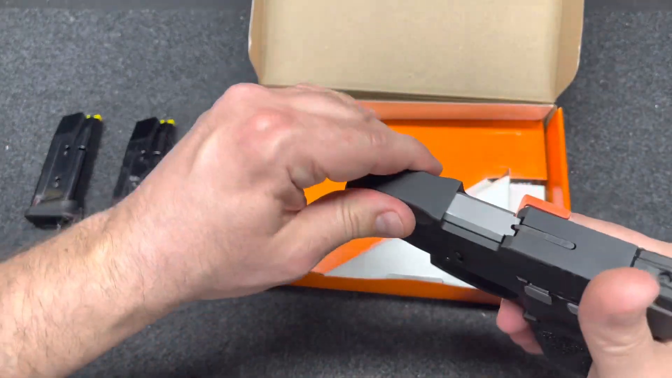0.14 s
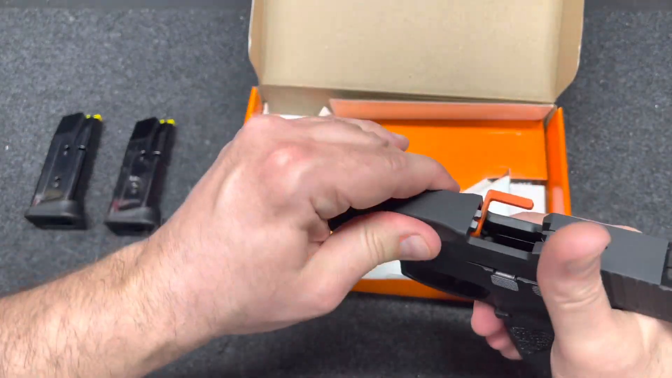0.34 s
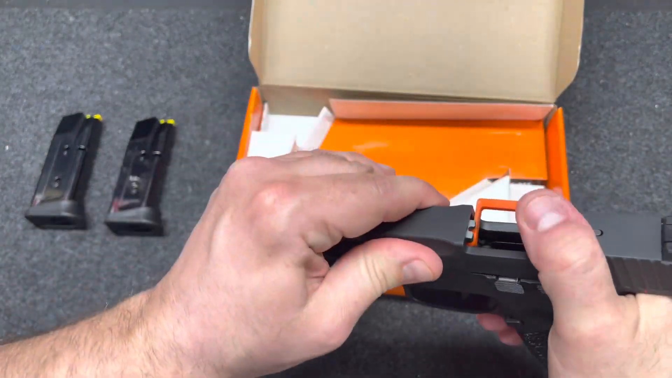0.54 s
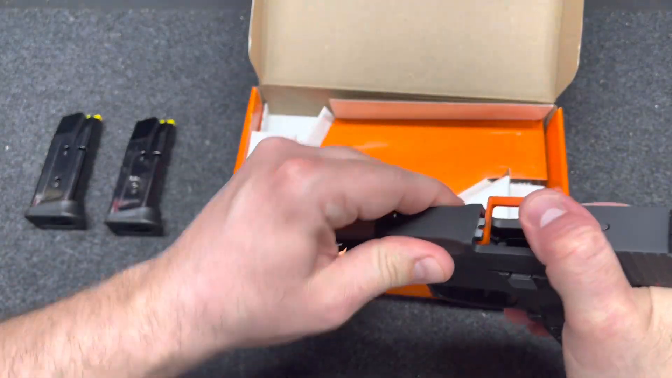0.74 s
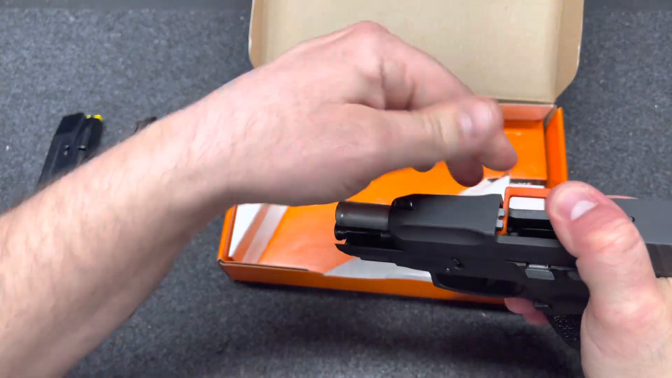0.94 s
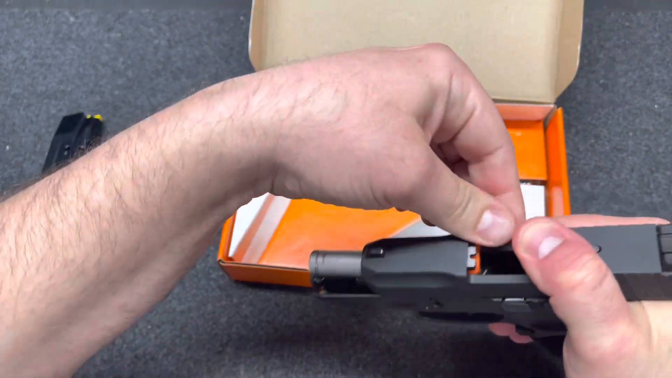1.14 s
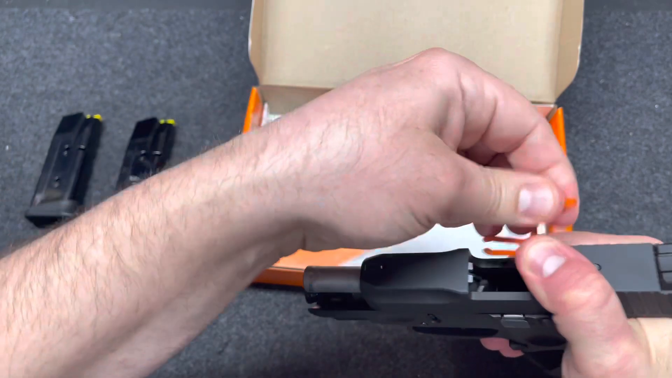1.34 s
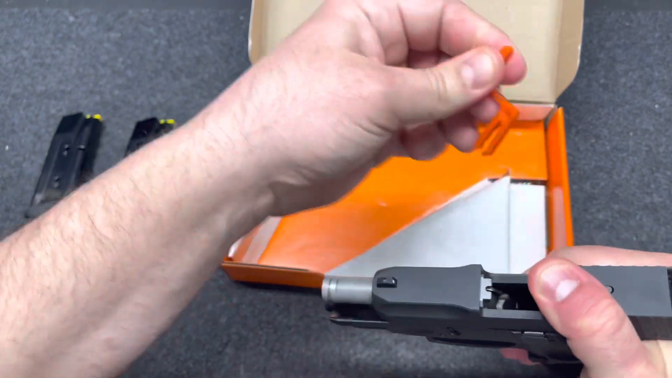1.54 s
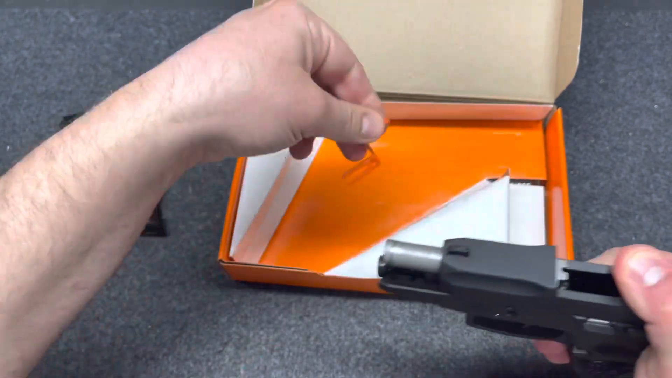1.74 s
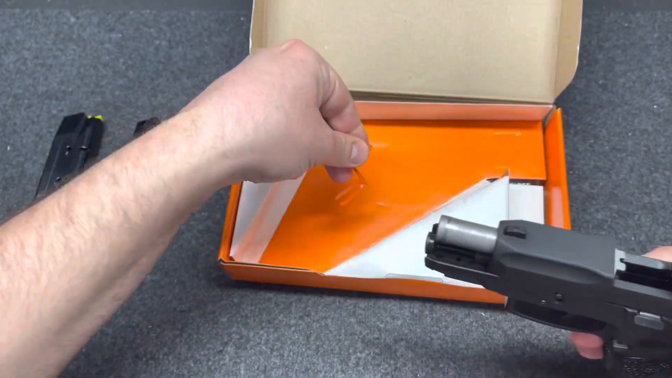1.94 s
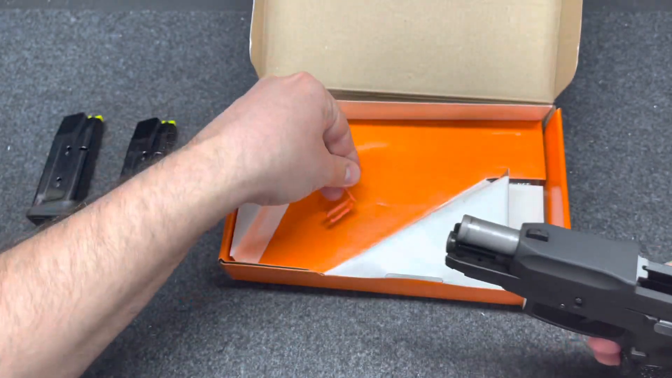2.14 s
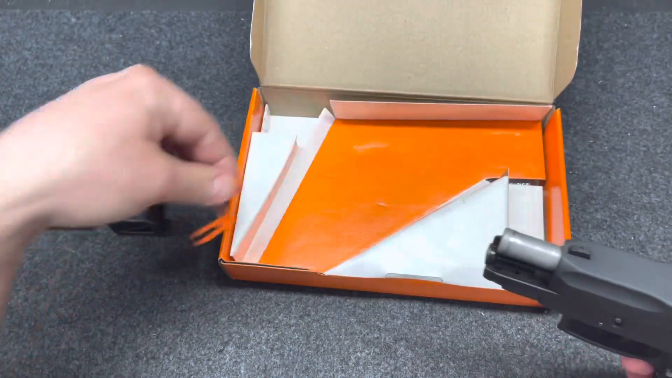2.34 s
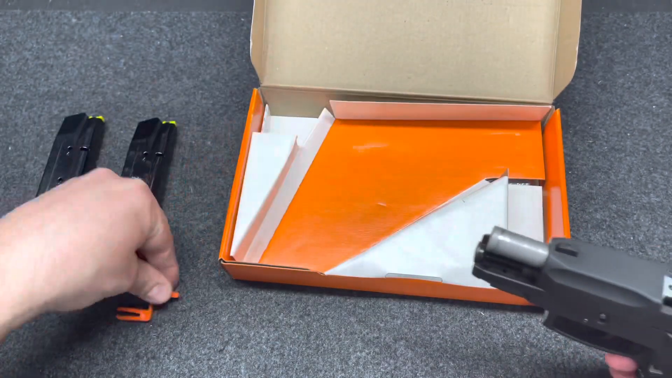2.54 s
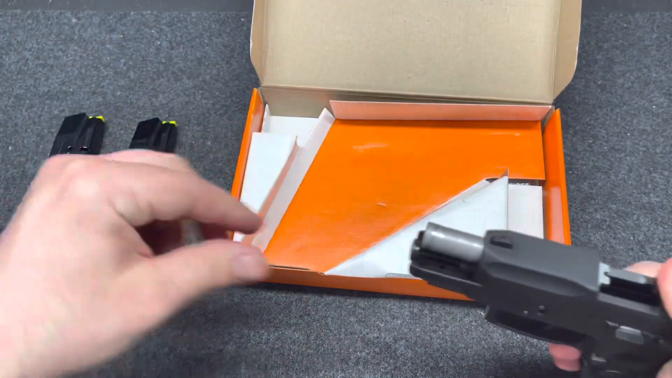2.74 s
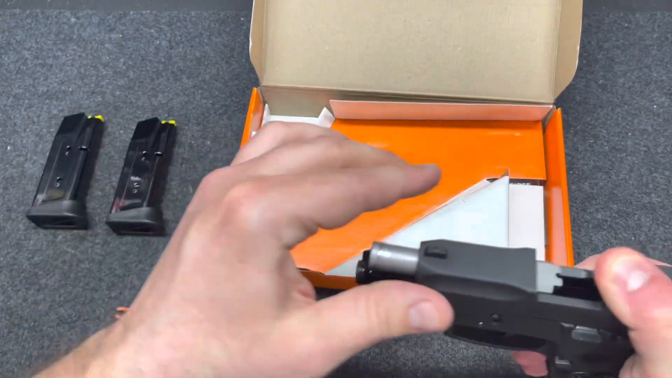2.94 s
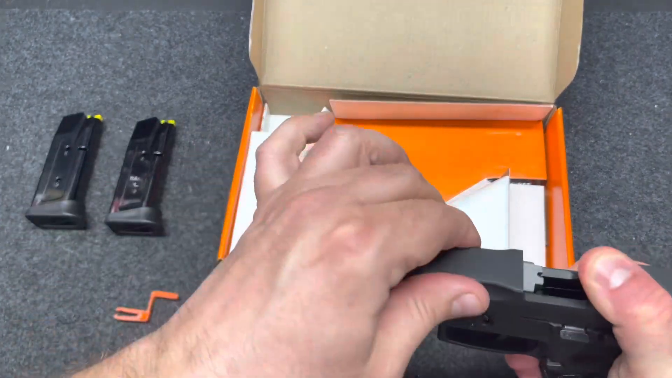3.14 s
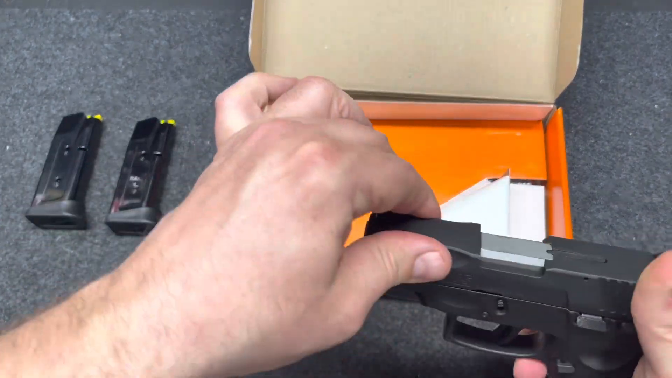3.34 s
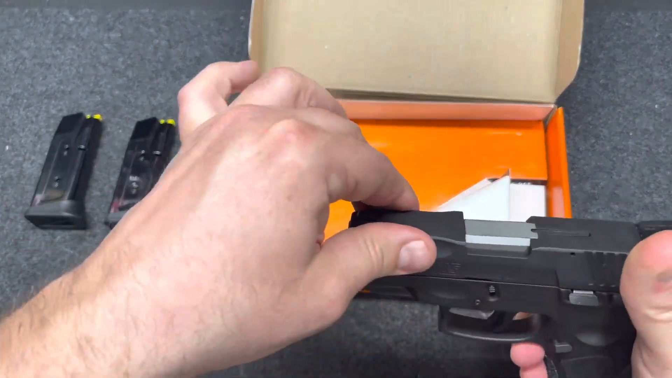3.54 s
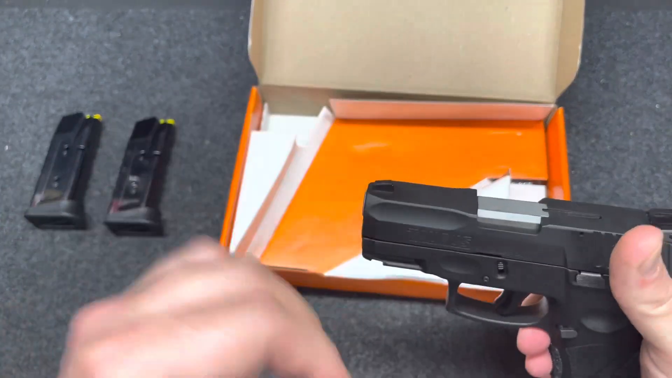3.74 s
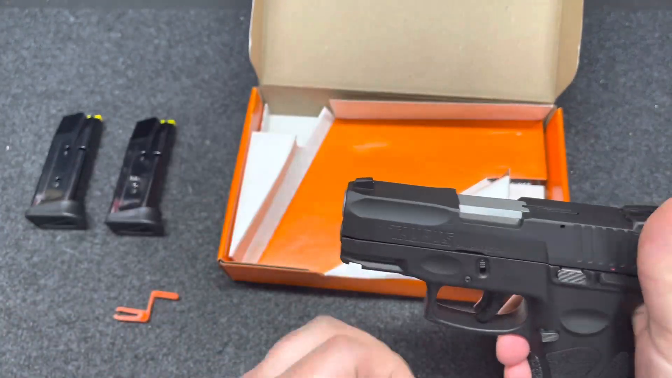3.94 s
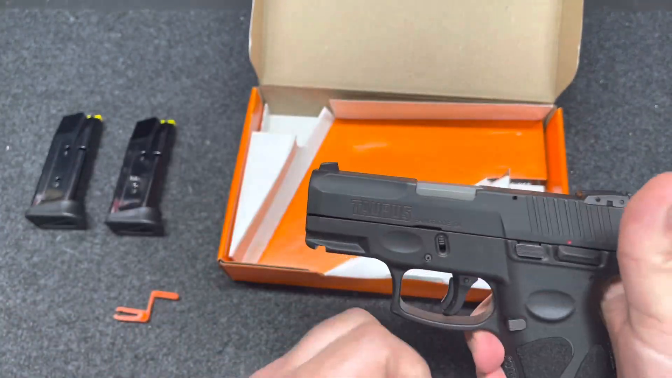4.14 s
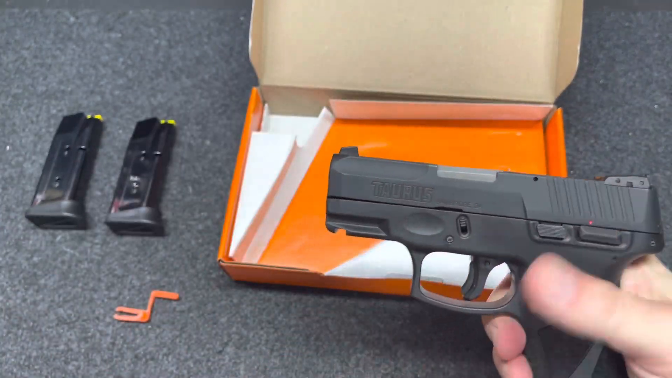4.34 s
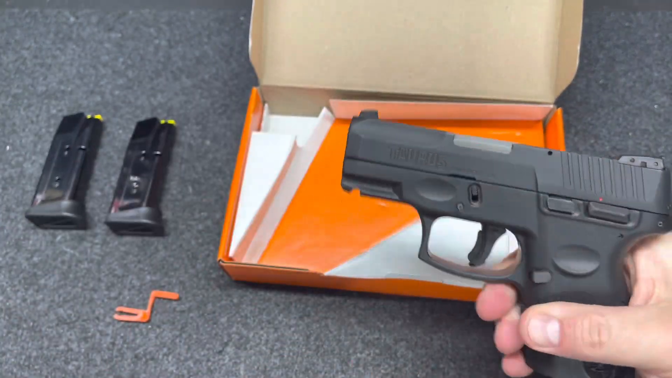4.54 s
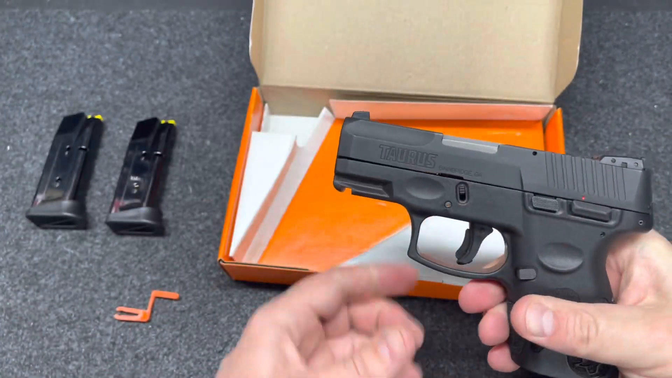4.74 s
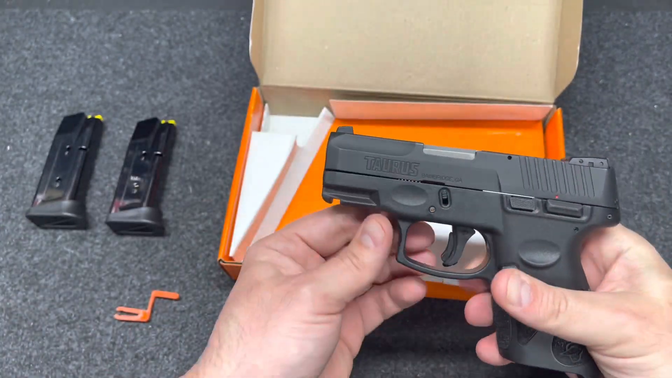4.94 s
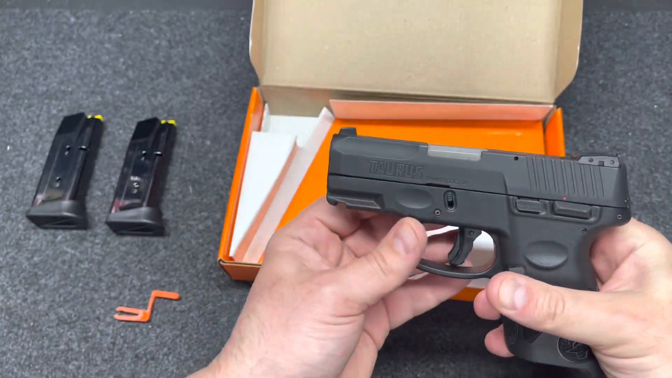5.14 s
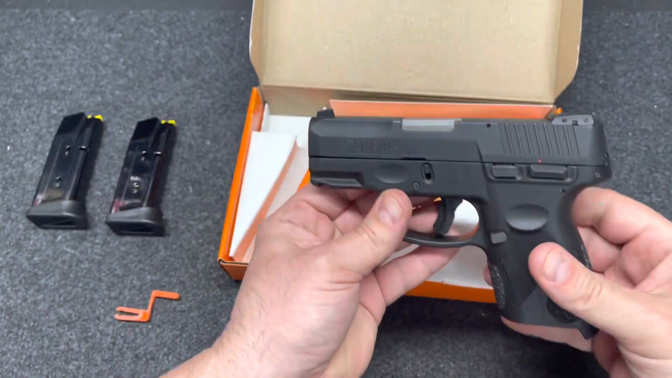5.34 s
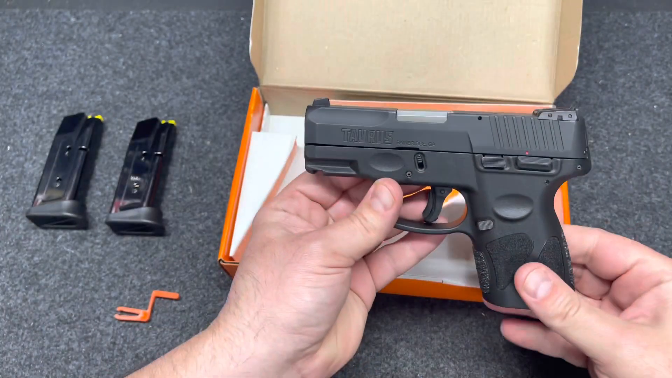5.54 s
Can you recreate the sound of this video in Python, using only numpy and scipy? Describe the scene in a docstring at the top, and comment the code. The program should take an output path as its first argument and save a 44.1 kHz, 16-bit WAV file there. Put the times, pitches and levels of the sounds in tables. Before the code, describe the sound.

A small quiet room with a soft low rumble and faint wavering motor hum throughout. Very close, a pistol slide is worked by hand. From 0.1 to 0.4 s a dense rattle of crisp steel clacks, strongest near 0.3 s, with high thin ringing and a soft low bump. Quiet follows, with light finger rubs and barely audible ticks. At about 1.2-1.3 s come moderate clicks, then a brighter cluster at 1.4-1.55 s with a clear barrel ring. Near silence, with a muffled double table tap at 2.5 s. At 2.9 s sharp loud clacks start, more at 3.03 s, then sliding chatter into the hardest snap at 3.22 s; the low background dips briefly after it. A faint narrow spring buzz fades from 3.4 s. From about 3.45 s to the end at roughly 5.6 s, only small dry skin-on-plastic rustles, clearest around 4.7 and 4.95 s.

```python
"""Pistol handled over a padded table

In a small quiet room the slide is drawn back, a plastic chamber flag is pulled out and laid down, and the slide
is eased forward until it locks. Steel contacts excite shaped noise and ringing modes; fingers rub in grainy noise;
soft bumps ring table modes; a motor hums as wavering sines in low air noise. A gain control cuts the bass briefly
after very loud clacks."""
import sys
import numpy as np
from scipy import signal
from scipy.fft import rfft, irfft, next_fast_len
from scipy.io import wavfile
from scipy.ndimage import uniform_filter1d

SR = 44100
rng = np.random.default_rng(int(sys.argv[2]) if len(sys.argv) > 2 else 0)


def wav_record(signal):
    """Record a signal, one row per channel, as 16-bit PCM in the file named by sys.argv[1]."""
    frames = np.transpose(np.atleast_2d(signal))
    bounded = np.clip(frames, -1, 1)
    # unit amplitude maps onto the largest positive 16-bit level
    quanta = np.round(bounded * 32767).astype(np.int16)
    wavfile.write(sys.argv[1], SR, quanta)


N = 246563
TIME = np.arange(N) / SR


def from_db(db):
    """Amplitude ratio of a level in dB."""
    return 10 ** (np.asarray(db) / 20)


def at_hz(points, hz, axis=1):
    """Read a table column on a log-frequency axis."""
    points = np.array(points)
    return np.interp(np.log(np.maximum(hz, 1)), np.log(points[:, 0]), points[:, axis])


def add(out, start_s, sound):
    """Mix a short sound in at its time."""
    start = max(round(start_s * SR), 0)
    out[:, start:start + sound.shape[-1]] += sound[..., :N - start]


def bandpass(x, low_hz, high_hz):
    """Second-order Butterworth band-pass."""
    return signal.sosfilt(signal.butter(2, [low_hz, high_hz], "band", fs=SR, output="sos"), x)


def colour(x, spectrum, modes=()):
    """Minimum-phase filter of unit power gain: a smooth spectrum with resonances standing on it."""
    size = 8192
    hz = np.fft.rfftfreq(size, 1 / SR)
    peaks = 1
    for mode_hz, width_hz, db in modes:
        peaks = peaks + from_db(db) / (1 + (2 * (hz - mode_hz) / width_hz) ** 2)
    gain = from_db(at_hz(spectrum, hz)) * peaks
    cepstrum = irfft(np.log(gain / np.sqrt(np.mean(gain ** 2))))
    # Folding the cepstrum makes the filter causal.
    cepstrum[1:size // 2] *= 2
    cepstrum[size // 2 + 1:] = 0
    impulse = irfft(np.exp(rfft(cepstrum)))
    return signal.fftconvolve(x, impulse[None], axes=1)[:, :x.shape[1]]


def correlated(mid, side, alike):
    """Mix independent mid and side noise into left and right of the given correlation."""
    return np.sqrt((1 + alike) / 2) * mid + np.sqrt((1 - alike) / 2) * side * np.array([[1], [-1]])


def noise_pair(alike, size=N):
    """White noise for two microphones with the given correlation."""
    mid, side = rng.standard_normal((2, size))
    return correlated(mid, side, alike)


def place(x, pan_db):
    """Make the left side louder than the right at constant power."""
    gains = from_db([[pan_db / 2], [-pan_db / 2]])
    return x * gains / np.sqrt(np.mean(gains ** 2))


def late_left(x):
    """Treble travels straight from the hands and reaches the left port a little later."""
    lag_s = 0.243e-3
    size = next_fast_len(N + 100)
    turn = np.exp(-2j * np.pi * np.fft.rfftfreq(size, 1 / SR) * lag_s)
    return np.array([irfft(rfft(x[0], size) * turn, size)[:N], x[1]])


def scattered(spans, per_s, spread_db):
    """Unevenly spaced events of uneven strength through each span: rows (time [s], level [dB])."""
    events = []
    for start_s, end_s, db in spans:
        jitter, size = rng.random(size=24), rng.standard_normal(size=24)
        times = start_s + (np.arange(len(jitter)) + jitter) / per_s
        events += [(s, db + spread_db * z) for s, z in zip(times, size) if s < end_s]
    return events


def background():
    """A motor's wavering hum in a soft rumble of air."""
    # room noise: (frequency [Hz], relative density [dB/Hz])
    air_spectrum = [(20, -35), (35, -12), (50, -2), (75, -3), (100, 0), (160, -8), (220, -13), (310, -13),
                    (420, -24), (700, -32), (1400, -42), (3500, -51), (11500, -58), (15000, -76)]
    # left-right correlation of the air: (frequency [Hz], correlation [0-1])
    likeness = [(50, 1), (125, 0.66), (250, 0.14), (1000, 0.28), (10000, .6)]
    # motor hum partials: (frequency [Hz], relative level [dB])
    hum_partials = [(59.2, -51), (118.4, -66.5), (198.5, -63), (236.9, -69.5), (296.1, -71), (318, -71.5)]
    alike = at_hz(likeness, np.fft.rfftfreq(N, 1 / SR))
    mid, side = rfft(rng.standard_normal((2, N)))
    white = irfft(correlated(mid, side, alike), N)
    rumble_cut = signal.butter(2, 42, "high", fs=SR, output="sos")
    air = from_db(-54.5) * signal.sosfilt(rumble_cut, colour(white, air_spectrum))
    knots = np.linspace(0, TIME[-1], 40)
    hum = 0
    for hz, db in hum_partials:
        swell, sway = [np.interp(TIME, knots, k) for k in rng.standard_normal((2, len(knots)))]
        phase = 2 * np.pi * (hz * TIME + rng.random()) + 0.39 * sway
        hum = hum + np.sqrt(2) * from_db(db + 2.1 * swell) * np.sin(phase)
    return place(air + from_db(-5.0) * hum, pan_db=5.0)


def room(x, build_s):
    """A diffuse tail that builds up after the direct sound and decays at its own rate in each band."""
    # reverberation: (frequency [Hz], t60 [s], relative level [dB])
    reverb = [(510, 1, -8), (1500, 0.29, -19.5), (3000, 0.31, -18.5), (6000, 0.35, -20.5),
              (8750, 0.16, -19.5), (12240, .28, -30)]
    t, tail = TIME[:SR * 3 // 4], 0
    edges_hz = np.geomspace(300, 12500, 10)
    for low_hz, high_hz in zip(edges_hz, edges_hz[1:]):
        hz = np.sqrt(low_hz * high_hz)
        build = 1 - np.exp(-(t / build_s) ** 2)
        decay = from_db(-60 * t / at_hz(reverb, hz, axis=1)) * build
        band = bandpass(rng.standard_normal((2, len(t))), low_hz, high_hz)
        tail = tail + band * decay / np.linalg.norm(decay) * from_db(at_hz(reverb, hz, axis=2))
    return place(signal.fftconvolve(x[:1], tail, axes=1)[:, :N], pan_db=3.0)  # fed by the left side


def bumps():
    """Soft low thuds ring the table's few damped modes; the padding takes the edge off them."""
    # bumps on the table and through the grip: (time [s], relative level [dB])
    bump_events = [(0.185, -41), (2.506, -49), (2.533, -38), (2.559, -44), (3.217, -36.5)]
    # table modes: (frequency [Hz], relative level [dB], t60 [s])
    table_modes = [(92.45, 8, 0.031), (136, -7.5, 0.067), (295.2, -7.5, 0.078), (420, -12, 0.025)]
    clicks, out = np.zeros(N), np.zeros(N)
    for s, db in bump_events:
        clicks[round(s * SR)] = from_db(db)
    for hz, db, t60_s in table_modes:
        r, w = from_db(-60 / (t60_s * SR)), 2 * np.pi * hz / SR
        resonator = [0, np.sin(w)], [1, -2 * r * np.cos(w), r * r]
        out += from_db(db) * signal.lfilter(*resonator, clicks + 1e-18)  # offset avoids denormals
    return place(bandpass(out, 55, 430), pan_db=6.0)


def fingers():
    """Skin sticks and slips in fine grains; each stroke excites the grip at a different spot."""
    # fingers slipping on the gun: (time [s], Gaussian sigma [s], relative level [dB])
    rubs = [(0.0, 0.082, -70), (0.785, 0.013, -67), (2.509, 0.0075, -75), (2.551, 0.014, -69.5),
            (3.455, 0.036, -66), (3.58, 0.0065, -75.5), (4.05, 0.064, -74), (4.337, 0.054, -72),
            (4.558, 0.025, -68.5), (4.701, 0.0086, -64), (4.876, .03, -73.5), (4.948, 0.015, -64.5),
            (5.103, 0.02, -72), (5.273, 0.042, -71.5), (5.414, 0.021, -69), (5.529, 0.018, -78.5)]
    # faint strokes as the grip shifts: (start [s], end [s], mean relative level [dB])
    grip_spans = [(0.5, 1.07, -78), (4.1, 4.55, -80.5)]
    # skin on polymer: (frequency [Hz], relative density [dB/Hz])
    rustle_spectrum = [(500, -1), (1300, 2), (2500, -6.5), (4500, -4.5), (7000, -8.5), (10000, -28.5),
                       (14000, -51)]
    # hiss of the slips: (frequency [Hz], relative density [dB/Hz])
    hiss_spectrum = [(1000, -34.5), (4000, -15.5), (7500, -15.5), (9200, -2.5), (10200, -12.5),
                     (11400, 2.5), (12400, -24), (13500, -31), (16000, -51.5)]
    t = TIME[:SR // 2]
    rustle, hiss = np.zeros((2, 2, N))
    shifts = [(s, 0.033, db) for s, db in scattered(grip_spans, per_s=8.1, spread_db=5)]
    for s, sigma_s, rustle_db in rubs + shifts:
        hiss_db = rustle_db - 3.5 - 5 * np.log2(sigma_s / 0.016)  # quick slips hiss more
        start_s = max(s - t[-1] / 2, 0)
        grain_db = 3.5 * np.interp(t, t[::90], rng.standard_normal(len(t[::90])))
        stroke = np.exp(-((start_s + t - s) / sigma_s) ** 2 / 2) * from_db(grain_db)
        # resonances: (frequency [Hz], width [Hz], level [dB])
        spot = [(hz * 2 ** rng.uniform(-0.5, 0.099), 450, 1.5) for hz in (1450, 2800, 4300)]
        rub = colour(noise_pair(0.8, size=len(t)) * stroke, rustle_spectrum, spot)
        add(rustle, start_s, from_db(rustle_db) * rub)
        slip = colour(noise_pair(0.6, size=len(t)) * stroke, hiss_spectrum)
        add(hiss, start_s, from_db(hiss_db) * slip)
    return from_db(1.0) * (place(rustle, pan_db=8.5) + late_left(hiss))


def spring():
    """As the slide settles, spring coils buzz against their guide in one narrow band that dies away."""
    start_s, centre_hz, width_hz, level_db, t60_s = 3.413, 5250, 600, -57.5, 0.28
    t, out = TIME[:SR // 3], np.zeros((2, N))
    noise = noise_pair(0.4, size=len(t))
    buzz = bandpass(noise, centre_hz - width_hz / 2, centre_hz + width_hz / 2)
    add(out, start_s, buzz / buzz.std() * from_db(level_db - 60 * t / t60_s))
    return place(out, pan_db=6.0)


def all_contacts():
    """Every clack with a faint, softer onset just before it and one rebound, plus the slide's rail chatter."""
    # steel clacks: (time [s], force [dB], edge tick re force [dB], barrel ring re force [dB])
    clacks = [(0.1207, -43, 3.5, -11.5), (0.136, -45, -7, -13.5), (0.1679, -28, -7, -16),
              (0.175, -33.5, -11, -9.5), (0.1838, -26, -9.5, -3), (0.1993, -34.5, -16.5, -20),
              (0.236, -42, -11.5, -10), (0.2551, -48, 5, 6), (0.265, -29.5, -9, -11),
              (0.285, -32.5, -5.5, -18), (0.289, -25.5, 3.5, 0.5), (0.3078, -18.5, -5, 1),
              (0.374, -51.5, -12, 0.5), (0.388, -45.5, -22, -18), (0.6268, -59.5, -14, -22),
              (0.644, -66, 7.5, -14), (1.0948, -74.5, -7.5, -10), (1.13, -76.5, -12.5, -12),
              (1.1879, -37.5, -11.5, -20), (1.2326, -32.5, -2.5, -8), (1.2878, -40, -19.5, -15),
              (1.3064, -35.5, -15, -4.5), (1.413, -44.5, 5, -3), (1.4225, -22.5, -2, -2.5),
              (1.433, -27.5, -11.5, 5), (1.4565, -29.5, -22, 5.5), (1.499, -36.5, -8, -1.5),
              (1.5305, -24.5, 2, 2.5), (1.768, -62, -12, -6), (1.7786, -52.5, -24, -24),
              (2.8902, -19, -1, -4), (2.902, -24, -8, 4), (2.9151, -23, -21, -3), (3.009, -45, -14.5, -12),
              (3.0234, -27, 5, -6), (3.0414, -23.5, -7, -2), (3.160, -38, -16, -13.5),
              (3.178, -33.5, -11.5, -12), (3.2024, -26, -6, -1.5), (3.2181, -15.5, 5.5, -4.5),
              (3.2232, -24.5, 11.5, 7), (3.249, -36, -3, -1), (3.288, -37, -16, 0), (3.406, -48, -9, -18),
              (3.412, -42.5, -4.5, -25), (3.436, -57, -30, -20), (3.599, -55.5, -41, -31)]
    # slide chattering along its rails: (start [s], end [s], mean force [dB])
    travels = [(0.268, 0.305, -32.5), (1.436, 1.456, -35), (2.895, 2.935, -39), (3.184, 3.217, -37)]
    rows = []
    for s, db, edge_db, ring_db in clacks:
        early, late = rng.uniform(0.75, 1.25, size=2)
        lead_in_db = -27 + 4.5 * rng.standard_normal()
        rows.append((s, db, edge_db, ring_db))
        rows.append((s - 0.006 * early, db + lead_in_db, edge_db, ring_db))
        rows.append((s + 0.007 * late, db - 14, edge_db, ring_db))
    chatter = scattered(travels, per_s=150, spread_db=3)
    chatter_edge_db, chatter_ring_db = -10.5, -2.5
    return np.array(rows + [(s, db, chatter_edge_db, chatter_ring_db) for s, db in chatter])


def blows(times, levels_db, scatter_t60_s, scatter_db, rise_s):
    """Envelope of all contacts: a sharp crack, then vibration scattering through the gun and off the table."""
    crack_t60_s = 0.018
    t, power = TIME[:SR // 4], np.zeros((1, N))
    crack = from_db(-60 * t / crack_t60_s) ** 2
    scatter = from_db(scatter_db - 60 * t / scatter_t60_s) ** 2
    shape = (crack + scatter) * (1 - np.exp(-t / rise_s)) ** 2
    shape /= shape[:SR // 280].mean()
    for s, db in zip(times, levels_db):
        add(power, s, from_db(db) ** 2 * shape)
    return np.sqrt(power[0])


def barrel(times, force_db, ring_db):
    """Each contact sets close barrel modes beating; the freer the barrel, the louder and longer its ring."""
    # long ring of the barrel: (frequency [Hz], mean relative level [dB])
    barrel_modes = [(8800, -11.5), (9080, 1), (9190, -5.5), (9318, -3.5), (9480, -9)]
    t, out = TIME[:SR // 7], np.zeros((2, N))
    hz, mode_db = np.transpose(barrel_modes)
    held_t60_s, free_t60_s = 0.04, 0.078
    ring_t60_s = np.interp(ring_db, [0, 5], [held_t60_s, free_t60_s])
    for s, db, t60_s in zip(times, force_db + ring_db, ring_t60_s):
        strength = from_db(mode_db + 2.5 * rng.standard_normal(len(hz)))
        pressed_hz = hz + 22 * rng.standard_normal(len(hz))  # pressure between the parts shifts the modes
        waves = np.sin(2 * np.pi * (pressed_hz[:, None] * t + rng.random((len(hz), 1))))
        swell = (1 - np.exp(-t / 0.00027)) * from_db(db - 60 * t / t60_s)
        add(out, s, swell * (strength @ waves) / np.linalg.norm(strength))
    return out


def pings(times, force_db, edge_db):
    """Each contact rings the small parts in a new mix, reaching the two ports slightly out of step."""
    # small steel parts: (frequency [Hz], relative level [dB], t60 [s])
    part_modes = [(1286, -6.5, .04), (1500, -9, .04), (2225, -5, .04), (2635, -10, 0.075),
                  (3112, -8, 0.034), (3641, -11, 0.021), (4025, -10, .035), (4510, -9, .035),
                  (5480, -6, .02), (6150, -6, .04), (11020, -14, .05), (15014, -38, .03)]
    t, out = TIME[:SR // 25], np.zeros((2, N))
    hz, mode_db, t60_s = np.transpose(part_modes)[:, :, None]
    fades = (1 - np.exp(-t / 0.00032)) * from_db(mode_db - 60 * t / t60_s)
    for s, db, edge in zip(times, force_db, edge_db):
        luck, pressure = rng.standard_normal((2, len(hz), 1))
        edge_reach_db = edge * hz / 5100  # blunt contacts miss the high modes
        strength = from_db(db + edge_reach_db + 5 * np.minimum(luck, 1))
        pressed_hz = hz * (1 + 0.012 * pressure)
        rings = strength * fades * np.exp(2j * np.pi * pressed_hz * t)
        phase = rng.random(len(hz)) + 0.055 * rng.standard_normal((2, len(hz)))
        add(out, s, np.real(np.exp(2j * np.pi * phase) @ rings))
    return place(out, pan_db=3.5)


def pistol():
    """Frame, slide and sharp edges each answer a contact in their own range."""
    # dense vibration of the frame: (frequency [Hz], relative density [dB/Hz])
    frame_spectrum = [(200, -30), (550, -20.5), (900, -11), (1270, -1.5), (1520, -0.5), (1780, -3),
                      (2250, 2), (2700, -5), (3300, -14.5), (6000, -42.5), (12000, -70.5)]
    # dense vibration of the slide: (frequency [Hz], relative density [dB/Hz])
    slide_spectrum = [(300, -56), (1200, -33.5), (2300, -10), (2900, 1.5), (4500, 0), (6200, -4),
                      (7300, -11), (8300, -8.5), (9500, -14), (12000, -49.5), (14000, -69)]
    # dense vibration of the edges: (frequency [Hz], relative density [dB/Hz])
    edge_spectrum = [(2000, -56), (6000, -38), (8300, -11), (9100, 1), (9700, 1.5), (10200, -7.5),
                     (11000, 2.5), (11700, -2), (12400, -12), (13400, -31.5), (16000, -55.5)]
    # resonances standing out of it: (frequency [Hz], width [Hz], relative level [dB])
    gun_modes = [(1483, 100, -3.5), (2270, 64, -3.5), (2580, 40, -4), (3360, 72, -11.5), (4080, 66, -4),
                 (4530, 140, -5.5), (4940, 45, -3.5), (5640, 120, -5.5), (6440, 170, -0.5),
                 (10760, 60, 1.5), (10760, 100, 0.5), (11460, 55, 0.5)]
    times, force_db, edge_db, ring_db = all_contacts().T
    # The knock follows only part of the force; blunt contacts knock more.
    firm_db = -23.5
    knock_db = -31.5 + 0.62 * (force_db - firm_db) - 0.11 * edge_db
    knock = noise_pair(0.7) * blows(times, knock_db, scatter_t60_s=0.031, scatter_db=-12.5, rise_s=0.0014)
    clack = noise_pair(0.15) * blows(times, force_db, scatter_t60_s=0.074, scatter_db=-15, rise_s=0.0012)
    tick_db = force_db + edge_db
    tick = noise_pair(0.9) * blows(times, tick_db, scatter_t60_s=0.054, scatter_db=-14.5, rise_s=0.00062)
    frame = from_db(-0.15) * place(colour(knock, frame_spectrum, gun_modes), pan_db=2.5)
    slide = from_db(-0.44) * place(colour(clack, slide_spectrum, gun_modes), pan_db=4.5)
    edges = from_db(0.37) * colour(tick, edge_spectrum, gun_modes)
    treble = edges + from_db(5.5) * barrel(times, force_db, ring_db)
    small_parts = from_db(-3.5) * pings(times, force_db, edge_db)
    return frame + slide + small_parts + place(late_left(treble), pan_db=0.14)


def scene():
    """Gun and hands close to the microphone, the room around them, thuds and hum below."""
    direct = pistol() + spring() + fingers()
    return direct + room(direct, build_s=0.011) + bumps() + background()


def duck_bass(x, threshold_db, depth_db, release_db_per_s, smoothing_s, corner_hz):
    """A very loud sound turns the bass down; the cut is released steadily and smoothed."""
    power = uniform_filter1d(np.mean(x ** 2, axis=0), SR // 70)
    level_db = 10 * np.log10(np.maximum(power, 1e-12))
    cut_db = depth_db * np.clip(level_db - threshold_db, 0, 1)  # full depth 1 dB above the threshold
    release_db = release_db_per_s * TIME
    cut_db = np.maximum.accumulate(cut_db + release_db) - release_db
    r = np.exp(-1 / (smoothing_s * SR))
    cut_db = signal.lfilter([1 - r], [1, -r], cut_db)
    bass = signal.sosfiltfilt(signal.butter(2, corner_hz, fs=SR, output="sos"), x)
    return x + bass * (from_db(-cut_db) - 1)


def record(dry):
    """Gain control on the bass, rounded peaks, and the top cut off."""
    x = duck_bass(dry, threshold_db=-13.5, depth_db=26.5, release_db_per_s=122.5, smoothing_s=0.045,
                  corner_hz=739)
    top_cut = signal.cheby2(12, 60, 16400, fs=SR, output="sos")  # 60 dB down from 16.4 kHz
    return signal.sosfilt(top_cut, np.tanh(x))


dry = scene()
out = record(dry)
wav_record(out)
```